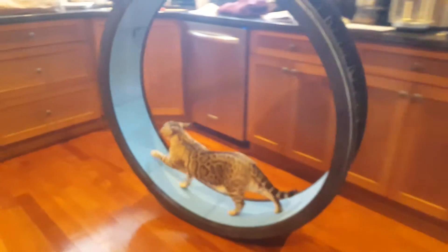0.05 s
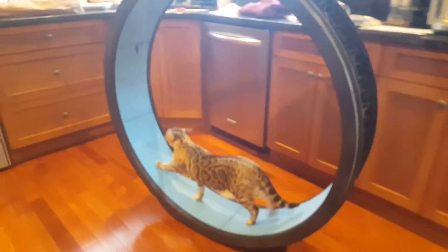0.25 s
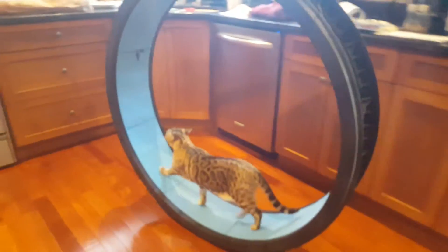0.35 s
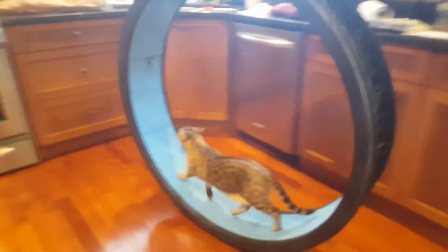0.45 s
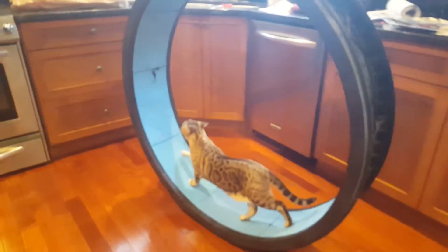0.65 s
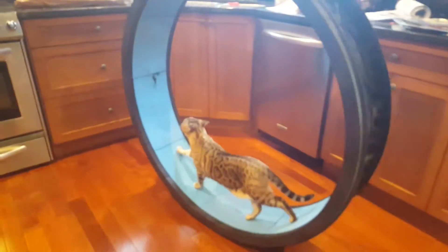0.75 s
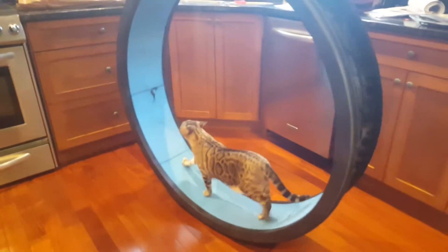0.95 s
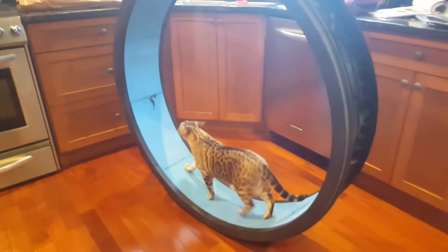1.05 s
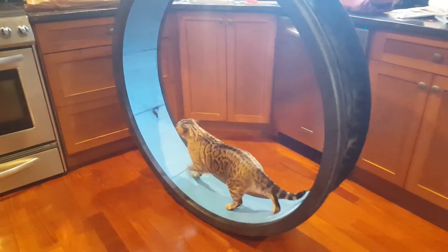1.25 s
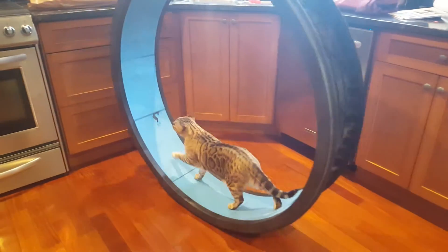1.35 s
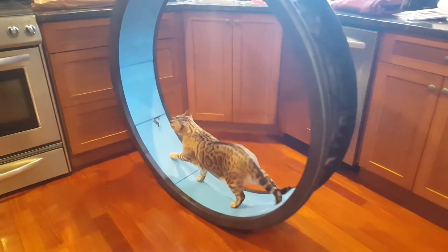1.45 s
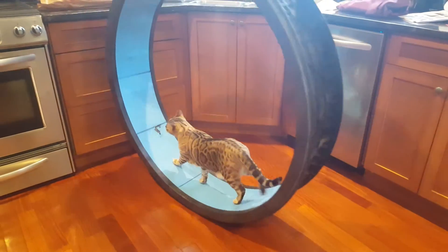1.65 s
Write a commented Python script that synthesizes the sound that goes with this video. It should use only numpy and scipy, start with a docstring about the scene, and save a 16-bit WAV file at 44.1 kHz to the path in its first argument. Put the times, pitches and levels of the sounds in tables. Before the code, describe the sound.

A cat walks in a softly rumbling exercise wheel, with hollow thumps early on.

```python
"""A soft rumble comes from a big plastic exercise wheel, turning on its rollers as a cat walks in it.
Early on, a cluster of hollow thumps excites the modes of the wheel and the wooden floor, with gritty
scuffs that ring the track and two sharp clicks; later come only faint knocks and ticks.
The kitchen reverberates briefly, over faint high swishes, a low mains hum and a thin hiss."""
import sys
import numpy as np
from scipy import signal
from scipy.fft import rfft, irfft, next_fast_len
from scipy.io import wavfile
from scipy.ndimage import map_coordinates

SR = 44100
rng = np.random.default_rng(int(sys.argv[2]) if len(sys.argv) > 2 else 0)


def put_to_file(sound):
    """Save the sound as 16-bit audio at rate SR, in the file named by the first command-line argument."""
    columns = np.atleast_2d(sound).T  # one column per channel
    safe = np.clip(columns, -1, 1)
    whole_steps = np.round(safe * 32767)
    wavfile.write(sys.argv[1], SR, whole_steps.astype(np.int16))


N = 74970


def rolling(flutter_db):
    """Forced vibration: the rollers run unevenly along the rim and drive its resonances."""
    # Loudness of the wheel. Each row: time in seconds, level in dB.
    levels = [(0, -52.5), (.2, -53.5), (.45, -49), (.7, -56.5), (.85, -58.5), (.96, -53), (1.085, -52),
              (1.16, -54.5), (1.33, -53), (1.6, -54), (1.7, -54)]
    # Rolling noise. Each row: frequency in Hz, relative level in dB.
    spectrum = [(25, -6), (60, -11.5), (150, -2.5), (260, -6), (420, -5.5), (620, -7), (850, -16),
                (1500, -18.5), (2400, -26), (4000, -37.5), (8000, -56)]
    # Rim modes. Each row: frequency in Hz, bandwidth in Hz, relative gain in dB.
    rim_modes = [(348.2, 8.3, -1.5), (513, 10.7, -9.5), (560.5, 11.7, -8.5), (1153.4, 6.3, -14),
                 (1468, 9.7, -22)]
    ring_db = -4
    rumble = coloured_noise(spectrum)
    ring = amp(ring_db) * unit(resonate(noise(np.ones_like), rim_modes))
    return amp(curve(levels) + flutter_db * wobble(34.8)) * (rumble + ring)


def thumps(wet_db):
    """Damped oscillation: each soft blow dies away, leaving wheel and floor ringing and shuddering."""
    # Each row: start in seconds, level in dB, pitch in Hz, 60 dB decay time in seconds.
    impacts = [(0.238, -26.5, 104.7, 0.094), (0.261, -37, 200, 0.033), (0.269, -25.5, 105, 0.088),
               (0.282, -37, 58.6, 0.15), (0.311, -37.5, 163.5, 0.097), (.345, -41.5, 150, 0.23),
               (0.374, -32, 97.3, 0.13), (0.407, -24, 170, 0.026), (0.462, -29.5, 153, 0.12),
               (0.493, -28, 382.7, 0.049), (0.4982, -16, 209, 0.037), (0.51, -24, 130.7, 0.097),
               (.532, -21, 227, 0.11), (0.543, -44, 57.2, 0.27), (0.568, -25.5, 145, .03),
               (0.589, -39.5, 188, 0.078), (.65, -41, 98, 0.12), (0.967, -39, 65.4, 0.059),
               (1.07, -39.5, 274, 0.087), (1.091, -42, 201, 0.023), (1.315, -40.5, 329, 0.089),
               (1.591, -44.5, 353, 0.046)]
    # Modes of wheel and floor. Each row: frequency in Hz, bandwidth in Hz, gain in dB.
    body_modes = [(54.6, 11.6, 1), (129, 34, -6), (205, 34, -1), (235, 5.1, 0.5), (406, 51, 0.5)]
    # The wheel's dull shudder. Each row: frequency in Hz, relative level in dB.
    spectrum = [(30, -28), (60, -10), (120, 0), (170, -10.5), (228, 3), (300, -12.5), (400, -10.5),
                (600, -41), (2000, -53)]
    rise_s, shudder_db, shudder_t60_s = .002, -9.5, 0.41
    blows, shudder_power = np.zeros(N), np.zeros(N)
    for start, db, hz, t60 in impacts:
        t = since(start)
        onset = amp(db) * (1 - np.exp(-t / rise_s))
        blows += onset * amp(-60 * t / t60) * np.sin(2 * np.pi * hz * t)
        shudder_power += (onset * amp(-60 * t / shudder_t60_s)) ** 2 * t60 / shudder_t60_s
    shudder = amp(shudder_db) * np.sqrt(shudder_power) * coloured_noise(spectrum)
    return kitchen(blows + resonate(blows, body_modes), wet_db) + shudder


def scuffs(grit_db, wet_db):
    """Friction: short gritty rubs excite the resonances of the hollow plastic track."""
    # Each row: start in seconds, level in dB, hold and 60 dB decay time in seconds, low shelf in dB.
    rubs = [(0.241, -50.5, 0.044, 0.19, 11), (0.262, -48, 0.02, 0.6, 1), (0.376, -45.5, 0.022, 0.41, -3.5),
            (0.462, -45.5, 0.028, 0.21, -4), (0.483, -31, 0.035, 0.18, 15.5),
            (0.52, -42.5, 0.016, 0.32, -7), (0.577, -52.5, 0.084, 0.079, 5.5),
            (1.312, -52, 0.013, 0.082, 24)]
    # Friction noise. Each row: frequency in Hz, relative level in dB.
    spectrum = [(100, 5), (330, -3), (750, -3), (1000, -2), (1400, 3.5), (1700, 3.5), (2300, 3),
                (2800, -10.5), (4500, -14.5), (6500, -49), (11000, -50), (16000, -44)]
    # Track modes. Each row: frequency in Hz, bandwidth in Hz, relative gain in dB.
    track_modes = [(409, 25, 0.5), (667, 24, -10), (998, 30, 3), (1158, 33, -4.5), (1333, 54, 5.5),
                   (1410, 40, -12), (1570, 12, -21), (1826, 21, 0), (2115, 16, 3), (2227, 13, 6)]
    rise_s, shelf_hz, ring_db = 0.0058, 1290, -3.5
    out = np.zeros((2, N))
    for start, db, hold, t60, shelf_db in rubs:
        friction = coloured_noise(spectrum)
        ring = amp(ring_db) * unit(resonate(noise(np.ones_like), track_modes))
        rub = unit(filtered(friction + ring, lambda f: amp(shelf_db / (1 + (f / shelf_hz) ** 4))))
        grit = unit(amp(grit_db * wobble(500)))
        attack = np.minimum(since(start) / rise_s, 1)
        out += rub * grit * attack * amp(db - 60 * since(start + hold) / t60)
    return kitchen(out, wet_db)


def clicks(wet_db):
    """Impulses: close, dry snaps have a broad spectrum and almost no ring."""
    # Each row: start in seconds, energy in dB, left over right in dB, high-pass corner in Hz.
    snaps = [(.5437, -15.5, 20, 740), (0.6638, -29.5, 20, 1620)]
    # A snap before the high-pass. Each row: frequency in Hz, relative level in dB.
    spectrum = [(200, 19), (1400, 13), (2200, 2), (5300, -10.5), (7600, -24.5), (12000, -24.5),
                (16000, -32)]
    out = np.zeros((2, N))
    for start, db, pan_db, corner_hz in snaps:
        impulse = signal.unit_impulse(N, round(start * SR))
        high_pass = lambda f: (1j * f / (corner_hz + 1j * f)) ** 2
        snap = filtered(impulse, lambda f: amp(along(spectrum, f)) * high_pass(f))
        out += amp(db) * panned(pan_db) * snap / np.linalg.norm(snap)
    return kitchen(out, wet_db)


def ticks(wet_db):
    """Light impacts: claws and plastic give bright bands of noise that decay exponentially."""
    # Each row: start in seconds, level in dB, centre in Hz, width in octaves,
    # 60 dB decay time in seconds, left over right in dB.
    taps = [(0.2353, -55.5, 4250, 0.33, 0.011, -5), (0.269, -52, 3770, 0.29, 0.01, -2),
            (0.3771, -44, 4070, 0.25, 0.025, -3), (0.937, -51.5, 2250, 0.48, 0.052, 3),
            (0.939, -53, 8100, 0.68, 0.041, 1), (1.004, -59.5, 11500, .2, 0.017, 1),
            (1.59, -50.5, 1760, 0.42, 0.043, -2)]
    rise_s = .0007
    out = np.zeros((2, N))
    for start, db, hz, octaves, t60, pan_db in taps:
        t = since(start)
        envelope = amp(db - 60 * t / t60) * (1 - np.exp(-t / rise_s))
        out += envelope * panned(pan_db) * band(hz, octaves)
    return kitchen(out, wet_db)


def swishes():
    """Amplitude modulation: a very high band of noise swells and fades like soft brushing."""
    # Each row: peak time in seconds, level in dB, seconds to fall to 1/e, left over right in dB.
    swells = [(.23, -76.5, 0.13, -2), (.495, -72, 0.03, -13), (0.67, -76, .04, -5),
              (0.756, -69.5, 0.042, -3)]
    out = np.zeros((2, N))
    for peak, db, fade, pan_db in swells:
        envelope = amp(db) * np.exp(-((since(0) - peak) / fade) ** 2)
        out += envelope * panned(pan_db) * band(hz=10800, octaves=0.23)
    return out


def mains_hum(hz, db, waver_db):
    """Forced vibration: the mains drives an appliance at one low tone, whose level wavers."""
    return amp(db + waver_db * wobble(7.65)) * unit(np.sin(2 * np.pi * hz * since(0)))


def hiss():
    """Broadband noise: a thin hiss slowly swells and recedes."""
    # Each row: time in seconds, level in dB.
    levels = [(0, -69), (.1, -70), (.26, -67.5), (.45, -70), (.5, -69), (.62, -65.5), (.76, -66.5),
              (.86, -69), (1.05, -71), (1.2, -71), (1.38, -70.5), (1.7, -73)]
    # Each row: frequency in Hz, relative level in dB.
    spectrum = [(1000, 2.5), (4000, 0.5), (6000, -3.5), (8500, -3.5), (11000, -2), (13500, -4),
                (16000, -2.5)]
    return amp(curve(levels)) * coloured_noise(spectrum)


def kitchen(x, wet_db):
    """Reverberation: x plus a diffuse tail in which each frequency decays at its own rate."""
    # Each row: frequency in Hz, 60 dB decay time in seconds.
    decay_times = [(150, 0.44), (1500, 0.64), (5000, 0.5), (12000, 0.31)]
    build_s = 0.0077
    hz, t, spectra = signal.stft(noise(np.ones_like)[:, :SR // 2], SR, nperseg=256)
    envelope = amp(-60 * t / along(decay_times, hz)[:, None]) * (1 - np.exp(-t / build_s))
    tail = signal.istft(spectra * envelope, SR, nperseg=256)[1]
    tail /= np.linalg.norm(tail[0])
    return x + amp(wet_db) * signal.fftconvolve(np.atleast_2d(x), tail, axes=1)[:, :N]


def noise(gain):
    """Partial coherence: stereo noise of rms 1, nearly mono in the bass and diffuse above."""
    # Each row: frequency in Hz, left-right correlation from 0 to 1.
    coherence = [(60, 0.96), (170, 0.84), (350, 0.91), (700, 0.58), (1300, 0), (8000, 0)]

    def mid_side_gains(f):
        angle = np.arccos(np.clip(along(coherence, f), -1, 1)) / 2
        return gain(f) * np.array([np.cos(angle), np.sin(angle)])

    mid, side = filtered(rng.standard_normal((2, N)), mid_side_gains)
    return unit(np.array([mid + side, mid - side]))


def coloured_noise(spectrum):
    """Spectral shaping: stereo noise of rms 1 that follows (Hz, dB) points."""
    return noise(lambda f: amp(along(spectrum, f)))


def band(hz, octaves):
    """Band-pass filtering: stereo noise under a bell curve in log frequency."""
    return noise(lambda f: np.exp(-.5 * (np.log2((f + 1) / hz) / octaves) ** 2))


def resonate(x, modes):
    """Modal superposition: x drives damped resonators in parallel."""
    return filtered(x, lambda f: sum(amp(db) * 1j * f * width / (hz * hz - f * f + 1j * f * width)
                                     for hz, width, db in modes))


def filtered(x, response):
    """Linear filtering: the spectrum of x times a complex frequency response."""
    size = next_fast_len(N + SR // 2)
    return irfft(rfft(x, size) * response(np.fft.rfftfreq(size, 1 / SR)), size)[..., :N]


def panned(left_db):
    """Left and right gains for a level difference."""
    return amp(np.array([[left_db], [-left_db]]) / 2)


def wobble(rate):
    """A smooth random curve, rate knots a second."""
    return map_coordinates(rng.standard_normal(4096), [np.arange(N) * rate / SR], mode="wrap")


def along(points, hz):
    """(Hz, value) points interpolated on a log axis."""
    freqs, values = np.transpose(points)
    return np.interp(np.log(hz + 1), np.log(freqs + 1), values)


def curve(rows):
    """(seconds, value) points interpolated at every sample."""
    return np.interp(np.arange(N) / SR, *np.transpose(rows))


def since(start):
    """Seconds since start, zero before."""
    return np.maximum(np.arange(N) / SR - start, 0)


def amp(db):
    """Decibels to gain."""
    return 10 ** (np.asarray(db) / 20)


def unit(x):
    """Scale to rms 1."""
    return x / np.sqrt(np.mean(x ** 2) + 1e-20)


def scene():
    """Superposition: the pressures of all sources add."""
    wheel = rolling(flutter_db=2.02) + thumps(wet_db=-11) + scuffs(grit_db=1.5, wet_db=-11.5)
    return (wheel + clicks(wet_db=-19) + ticks(wet_db=-1.5) + swishes()
            + mains_hum(hz=59.2, db=-60, waver_db=1.5) + hiss())


def record(dry):
    """Band limiting: the deepest bass rolls off and the highest treble is cut."""
    low_cut_hz, top_hz = 38, 15900
    return filtered(dry, lambda f: (f < top_hz) * (1 - 1 / (1 + (f / low_cut_hz) ** 6)))


dry = scene()
out = record(dry)
put_to_file(out)
```